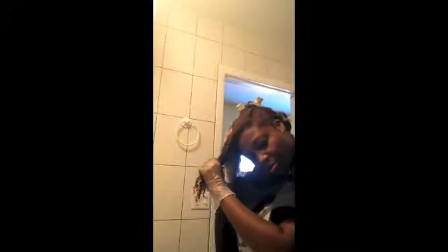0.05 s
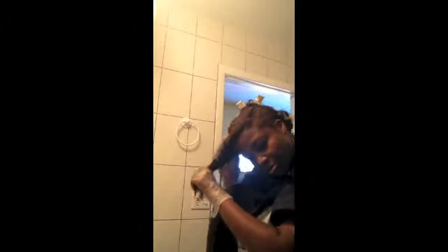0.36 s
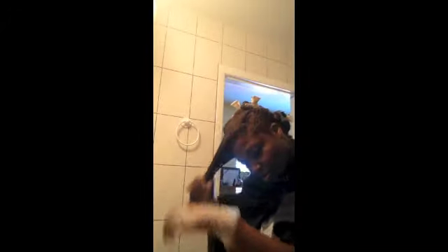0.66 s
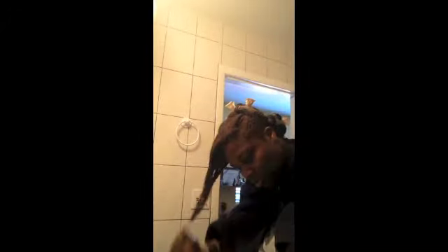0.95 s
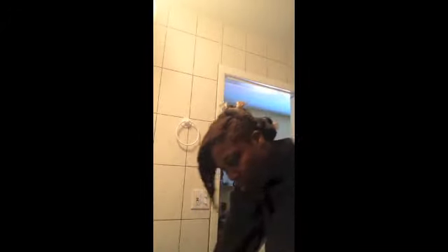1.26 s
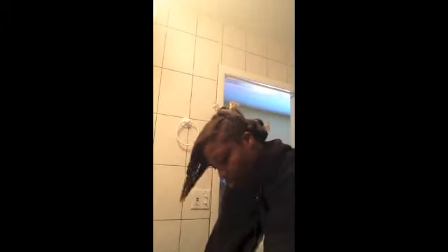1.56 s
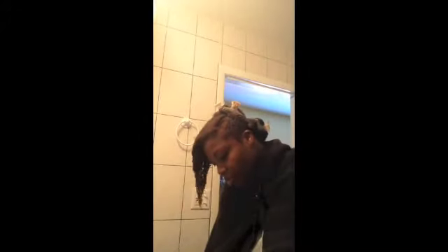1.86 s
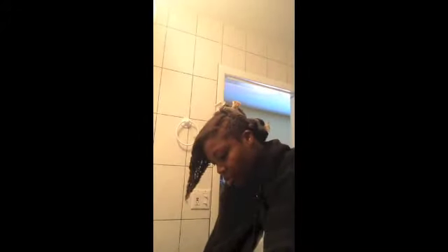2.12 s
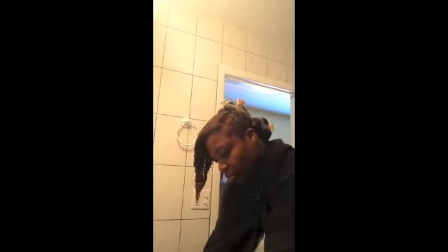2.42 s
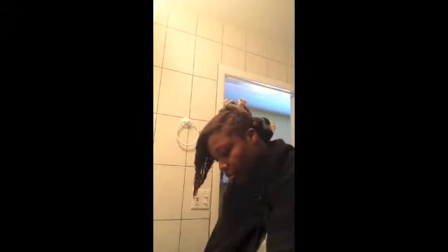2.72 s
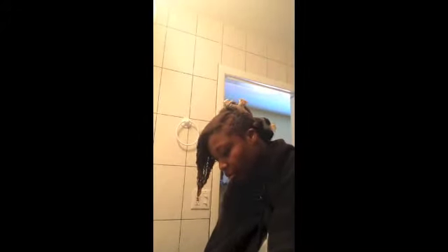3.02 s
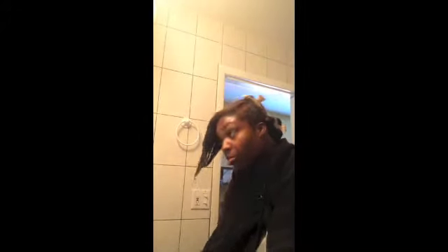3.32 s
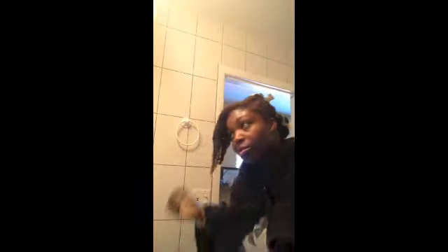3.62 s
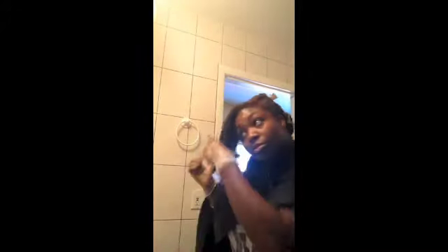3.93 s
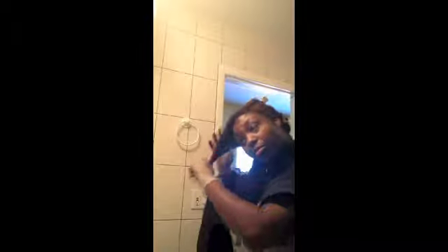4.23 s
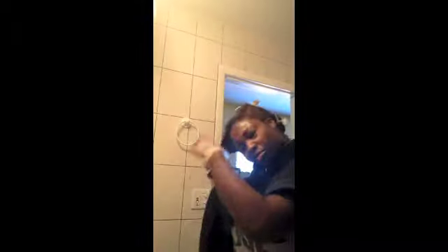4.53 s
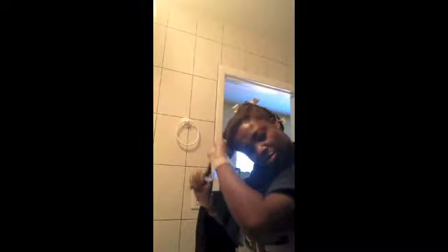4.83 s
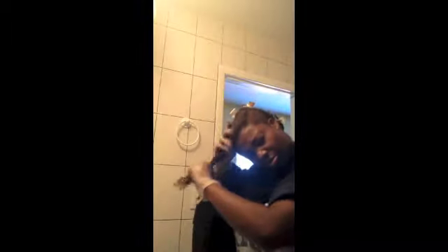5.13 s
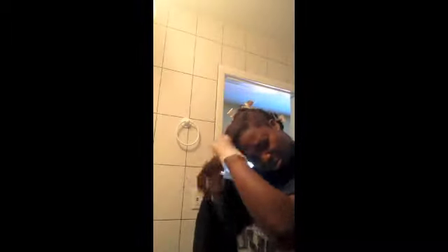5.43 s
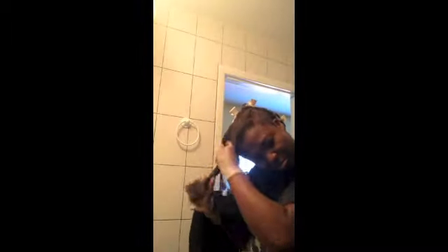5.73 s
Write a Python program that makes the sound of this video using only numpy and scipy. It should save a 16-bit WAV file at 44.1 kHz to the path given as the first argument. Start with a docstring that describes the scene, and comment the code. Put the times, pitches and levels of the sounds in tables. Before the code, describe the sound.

In a quiet tiled bathroom with a faint electrical hum, gloves slide softly down wet hair. A short, low rubbing judder and a few bumps come from the counter, then sleeves swish and fingers tap a hollow plastic container. The container lands with a loud knock, the loudest sound, and clatters briefly. Soft strokes return with crinkles, small squelches and a sharp snap of glove film, all heard through one microphone.

```python
"""Gloved hands work dye through a lock of hair in a small tiled bathroom.
Friction, a dense train of tiny slips, makes wet strands hiss and sleeves rustle; the glove film
crinkles as it buckles and snaps as it comes unstuck. The hands drag on the counter, bump it and tap
a plastic container, exciting their damped normal modes. The container is put down hard, bounces and
rocks to rest. The tiles add a short reverberation, and a faint mains hum lies underneath."""
import sys
import numpy as np
from scipy import signal
from scipy.fft import rfft, irfft
from scipy.io import wavfile

SR = 44100
rng = np.random.default_rng(int(sys.argv[2]) if len(sys.argv) > 2 else 0)


def bounce(signal):
    """Save signal as a 16-bit WAV file at the path given by the first command-line argument."""
    frames = np.transpose(np.atleast_2d(signal))
    limited = np.clip(frames, -1, 1)
    pcm = np.round(limited * 32767).astype(np.int16)
    wavfile.write(sys.argv[1], SR, pcm)


N = 254456
TIME = np.arange(N) / SR

# strokes of a glove down the lock: peak_s, length_s, hiss_db, rub_db, crease_hz
STROKES = [(.01, 0.071, -60.5, -70, 4760), (0.122, 0.17, -64.5, -73.5, 4650), (0.284, 0.14, -58, -69, 3600),
           (0.442, 0.22, -62, -70.5, 4560), (0.585, 0.13, -60.5, -68, 3300),
           (0.8, 0.57, -63.5, -70.5, 5150), (0.93, 0.07, -65, -57, 2980), (1.032, 0.03, -62, -53.5, 2920),
           (1.084, 0.078, -62, -55, 2500), (4.054, 0.086, -75, -95, 8000), (4.287, 0.3, -64, -80, 4130),
           (4.477, 0.26, -71, -76, 5020), (4.7, 0.5, -62, -73.5, 4260), (4.908, 0.19, -64, -71.5, 4900),
           (5.103, 0.25, -59, -69.5, 4000), (5.268, 0.12, -57.5, -64, 4970),
           (5.483, 0.49, -60.5, -68.5, 4130), (5.653, 0.083, -66, -67.5, 2330),
           (5.77, 0.19, -58.5, -65.5, 5200)]
# friction spectra of the strands and of the glove: frequency_hz, density_db
HAIR_SPECTRUM = [(880, -27.5), (1500, -8.5), (1590, -12), (2110, -5.5), (3280, -8), (4100, 0.5), (5450, -2),
                 (6560, 1), (12600, -2), (14600, -2), (15500, -4)]
RUB_SPECTRUM = [(200, -2.5), (800, -5.5), (1350, -10.5), (1900, -2), (2400, 2.5), (3200, -1), (4200, -4.5),
                (7000, -16.5)]
# partials of the mains hum: frequency_hz, rms_db
HUM_PARTIALS = [(58, -77), (120, -72.5)]
# spectrum of the background air: frequency_hz, density_db
AIR_SPECTRUM = [(25, -17.5), (55, 3.5), (90, -6), (150, -3), (260, -9.5), (500, -8), (800, -14.5),
                (1300, -23), (2400, -28.5), (4000, -34), (15000, -34.5)]
# folds of the glove buckling: start_s, length_s, level_db, pitch_hz
CRINKLES = [(.009, .006, -64, 4950), (0.247, .015, -65, 4500), (0.286, 0.0034, -54.5, 3230),
            (0.58, 0.0056, -54, 3100), (0.904, .012, -66, 2570), (1.996, 0.0053, -59, 2880),
            (3.1865, .009, -58.5, 14800), (4.011, .02, -73, 2480), (4.298, .035, -69, 5000),
            (4.349, .014, -67, 3600), (4.463, .006, -69.5, 8000), (4.86, .025, -62, 4340),
            (4.909, 0.01, -61.5, 3980), (5.037, .02, -64, 4410), (5.086, .02, -60, 4600),
            (5.24, .012, -65, 9000), (5.295, .008, -59, 8000), (5.358, .015, -64, 3800),
            (5.427, .008, -57, 7700), (5.457, .006, -47, 9900), (5.507, .018, -60.5, 4350),
            (5.693, .007, -59, 6950), (5.744, .015, -61, 4970)]
# sticky glove film letting go: start_s, snap_db, squelch_db
SNAPS = [(0.286, -66, -56), (0.578, -63, -51), (0.94, -43.5, -72), (1.073, -40, -44.5), (1.349, -42, -66),
         (2.531, -39, -75), (2.694, -53, -55), (2.853, -64, -49.5), (3.187, -57, -70), (3.215, -48, -51.5),
         (4.322, -45, -78), (4.354, -44, -73), (4.692, -57.5, -59), (4.867, -45, -64), (5.128, -57, -58.5),
         (5.457, -46, -62), (5.465, -22, -57), (5.558, -54, -54.5)]
# spectra of the snapping film and of the paste under it: frequency_hz, density_db
SNAP_SPECTRUM = [(500, -52), (1300, -17), (2000, -10), (3200, -15), (4100, 2.5), (5300, -8), (6500, 2.5),
                 (7200, 2), (8000, 1), (10500, -1.5), (13000, 0.5), (15000, -1.5)]
SQUELCH_SPECTRUM = [(500, -21), (1400, -16), (2300, 0), (3000, -1), (4100, -16.5), (6000, -7.5),
                    (15000, -25.5)]
# a sleeve brushing past as an arm moves: peak_s, length_s, swish_db, brush_db
SLEEVE_MOVES = [(1.3, 0.84, -71, -70.5), (1.622, 0.18, -66, -71.5), (1.805, 0.23, -66.5, -68),
                (2, 0.37, -65, -75.5), (2.308, 0.17, -64, -72.5), (2.565, 0.19, -75.5, -83),
                (2.815, 0.2, -67.5, -62.5), (3.029, 0.15, -70, -74.5), (3.225, 0.16, -63, -73),
                (3.524, 0.029, -52.5, -48.5), (3.783, 0.85, -68.5, -71)]
# spectra of the bright swish and the dull brush of cloth: frequency_hz, density_db
SWISH_SPECTRUM = [(760, -45.5), (1300, -14), (1730, -3), (2210, -3), (2800, -0.5), (3690, -3.5), (8040, -5),
                  (15000, -11.5)]
BRUSH_SPECTRUM = [(80, -4), (190, 2), (350, 12.5), (550, 7), (900, 3.5), (1500, -9.5), (4000, -39.5)]
# course of the glove's drag on the counter: time_s, slip_rate_hz, level_db
DRAG_PATH = [(1.02, 190, -66), (1.048, 190, -46), (1.063, 190, -58), (1.073, 165, -42), (1.081, 152, -26.5),
             (1.1, 142, -28.5), (1.108, 193, -32), (1.122, 200, -32), (1.133, 215, -38), (1.141, 175, -32),
             (1.15, 170, -53), (1.175, 185, -49), (1.22, 190, -70)]
# harmonics of the slip rate, from the first upward: level_db
JUDDER_HARMONICS = [-0.5, -31, -32.5, -40]
# spectrum of the rough part of the drag: frequency_hz, density_db
SCUFF_SPECTRUM = [(60, -12), (130, 0), (280, 0), (400, -4), (500, -16), (595, 0), (700, -15), (1200, -22),
                  (4000, -40)]
# soft bumps against the counter: start_s, level_db, contact_s, free_ringing_s
BUMPS = [(1.0665, -48, 0.0045, 0.028), (1.3486, -42.5, 0.00098, .4)]
# modes of the counter panel: frequency_hz, level_db, t60_s
COUNTER_MODES = [(153.3, 6.5, 0.12), (207, 0, 0.28), (320, 5.5, 0.065), (359, 7, 0.07), (478, 3.5, 0.044),
                 (574, 0, 0.058), (790, -5, 0.12), (1040, -7, 0.044)]
# fingers tapping the container: start_s, knock_db, rim_db, wall_hz, wall_db, contact_s
TAPS = [(1.069, -46, -47, 575, -55, 0.0013), (1.136, -51, -43.5, 264, -40.5, .001),
        (1.154, -51, -37, 592, -44.5, 0.0014), (1.166, -48, -38, 570, -61, 0.00082),
        (1.414, -68, -65.5, 407, -66, 0.00067), (2.362, -57, -69, 527, -62, 0.001),
        (2.651, -50.5, -78, 211, -59, 0.0025), (2.696, -47, -63, 270, -47, 0.0012),
        (2.818, -55.5, -60, 594, -55, 0.00085), (2.857, -60, -56, 203, -50.5, 0.00081),
        (3.216, -56, -51, 310, -53, 0.0013), (3.236, -47, -51, 156, -49, 0.0012),
        (3.277, -54.5, -53.5, 454, -50, 0.001), (3.287, -47.5, -58.5, 337.6, -59, 0.0009)]
# modes of the hollow container in the hand: frequency_hz, level_db, t60_s
HOLLOW_MODES = [(130, -5, 0.093), (195, -1, 0.053), (346, 6, 0.042), (440, 5, 0.03), (549, -0.5, 0.075),
                (780, 0.5, 0.017)]
# spectrum of the rim's clack: frequency_hz, density_db
RIM_SPECTRUM = [(100, -60), (500, -2.5), (1000, -3.5), (1600, -3), (2700, 0), (3600, -11), (6000, -20),
                (14000, -34)]
# the container landing and bouncing: start_s, ring_db, crack_db, mode_scatter_db, cutoff_hz, thump_db
LANDINGS = [(3.5201, -38.5, -14.5, 1, 14800, -57), (3.5699, -56.5, -22, -1.5, 9620, -54),
            (3.5955, -62, -27.5, 5.5, 7600, -70)]
# modes of the container on the counter, and of the cabinet below: frequency_hz, level_db, t60_s
CONTAINER_MODES = [(143.8, 10, 0.4), (215.5, 7, 0.2), (244.3, 6, 0.15), (325, -1, 0.066), (369, 8.5, 0.24),
                   (401.7, 5, 0.26), (459, 6.5, 0.2), (503, 9, 0.21), (520, 7.5, 0.13), (630, -3, 0.22),
                   (720, -2, 0.24), (799, -1.5, 0.22), (850, -0.5, 0.32), (941, 0.5, 0.25),
                   (1005, 17, 0.092), (1083, 9, .08), (1198, 8.5, 0.05), (1389, -5.5, 0.25),
                   (1471, 7.5, 0.12), (1617, 6, .085), (1974, 7.5, 0.05), (2183, 6, 0.09),
                   (2300, -4, 0.055), (2900, 4.5, 0.05), (3440, -5, .08), (3660, 7.5, 0.062),
                   (4330, 3, 0.059), (4225, 4, 0.035), (4540, 0, 0.065), (4750, 5, 0.05), (5400, 0, 0.05),
                   (6970, 0, .05), (7280, -4.5, 0.036), (8730, 6, 0.027)]
CABINET_MODES = [(33, 1, 0.18), (48, -7, .17)]
# spectrum of the hard contact: frequency_hz, density_db
CRACK_SPECTRUM = [(40, -28), (100, -34.5), (250, 0), (500, 9), (1000, -4.5), (1750, -9), (2200, 0),
                  (2650, -11), (3350, -4.5), (4000, -8.5), (4450, -4.5), (5300, -10.5), (6900, -9.5),
                  (8000, -11), (11000, -17.5), (15000, -21)]
# contacts of the rocking base: start_s, level_db
ROCKS = [(3.675, -48.5), (3.761, -56), (3.822, -48.5), (3.884, -47.5), (3.918, -55), (3.967, -56.5)]
# spectrum of the base's clatter: frequency_hz, density_db
BASE_SPECTRUM = [(100, -20), (330, 10.5), (480, 2), (750, -15), (1180, 2.5), (1700, -15), (2350, 6),
                 (2900, -13), (3400, -8.5), (5000, -18.5), (12000, -28)]
# reverberation time of the bathroom: frequency_hz, t60_s
ROOM_T60 = [(100, 0.32), (300, 0.22), (1000, 0.26), (3000, 0.21), (8000, 0.24), (15000, 0.18)]


def from_db(db):
    """Amplitude ratio of a level in decibels."""
    return 10 ** (np.asarray(db) / 20)


def unit_rms(x):
    """Normalisation to unit mean power."""
    return x / np.sqrt(np.mean(x ** 2) + 1e-20)


def at_hz(points, hz):
    """Interpolation on a logarithmic frequency axis."""
    freqs, values = np.transpose(points)
    return np.interp(np.log(hz + 1e-6), np.log(freqs), values)


def butterworth(x, kind, hz, order=2):
    """Filter with a maximally flat passband."""
    return signal.sosfilt(signal.butter(order, hz, kind, fs=SR, output="sos"), x)


def colour(x, spectrum, size=4096):
    """Minimum-phase filtering by the folded cepstrum; white noise keeps its power."""
    gain = unit_rms(from_db(at_hz(spectrum, np.fft.rfftfreq(size, 1 / SR))))
    cepstrum = irfft(np.log(gain))
    cepstrum[1:size // 2] *= 2
    cepstrum[size // 2 + 1:] = 0
    return signal.fftconvolve(x, irfft(np.exp(rfft(cepstrum))))[:len(x)]


def add(track, start_s, sound):
    """Superposition of a delayed sound on a track."""
    start = round(start_s * SR)
    track[start:start + len(sound)] += sound[:N - start]


def reflections(x):
    """Diffuse reverberation: a unit-energy tail of echoes from the tiles decays band by band."""
    t, tail = TIME[:SR * 2 // 3], 0
    edges = np.geomspace(60, 18000, 13)
    for low, high in zip(edges, edges[1:]):
        band = butterworth(rng.standard_normal(len(t)), "band", [low, high])
        tail = tail + band * from_db(-60 * t / at_hz(ROOM_T60, np.sqrt(low * high)))
    tail *= np.clip(t / 0.0028, 0, 1) ** 2
    return signal.fftconvolve(x, tail / np.linalg.norm(tail))[:N]


def bathroom(x, wet_db):
    """Direct sound plus the reverberant field."""
    return x + from_db(wet_db) * reflections(x)


def clicks(times, levels_db):
    """An ideal impulse for each contact."""
    out = np.zeros(N)
    out[np.round(times * SR).astype(int)] = from_db(levels_db)
    return out


def bursts(times, levels_db, t60_s, rise_s, wet_db):
    """Dense, heavily damped modes merge into a decaying noise at each contact; the room answers."""
    out, t = np.zeros(N), TIME[:SR // 4]
    envelope = np.minimum(t / rise_s, 1) * from_db(-60 * t / t60_s)
    for start_s, db in zip(times, levels_db):
        add(out, start_s, from_db(db) * envelope * rng.standard_normal(len(t)))
    return out + from_db(wet_db) * np.linalg.norm(envelope) * reflections(clicks(times, levels_db))


def soft_push(t, contact_s):
    """Force pulse of unit sum: the longer the contact, the narrower its spectrum."""
    force = np.sin(np.pi * np.minimum(t / contact_s, 1)) ** 2
    return force / force.sum()


def ring(force, modes):
    """Modal superposition: damped oscillators share one force, neighbours swinging in opposite senses."""
    out = 0
    for k, (hz, db, t60_s) in enumerate(modes):
        radius, angle = from_db(-60 / (t60_s * SR)), 2 * np.pi * hz / SR
        feedback = [1, -2 * radius * np.cos(angle), radius ** 2]
        out = out + (-1) ** k * from_db(db) * signal.lfilter([0, np.sin(angle)], feedback, force + 1e-18)
    return out


def wander(per_s):
    """Slow random modulation: Gaussian values joined by straight lines."""
    knots = TIME[::SR // per_s]
    return np.interp(TIME, knots, rng.standard_normal(len(knots)))


def slips(per_s, spread_db, clump_db):
    """Friction as shot noise: tiny slips of uneven size, in clumps of some 15 ms; rms 1."""
    clumps = from_db(clump_db * wander(per_s=70))
    sizes = from_db(spread_db * np.minimum(rng.exponential(1, N), 5))
    return unit_rms(clumps * sizes * rng.choice([-1, 1], N) * (rng.random(N) < per_s / SR))


def swells(times, lengths, levels_db, rise_share=0.52, flatness=2.8):
    """Each movement swells to its greatest speed and fades; incoherent overlaps add in power."""
    coarse_time, power = TIME[::64], 0
    for peak_s, length_s, db in zip(times, lengths, levels_db):
        offset = (coarse_time - peak_s) / length_s
        distance = np.maximum(-offset / rise_share, offset / (1 - rise_share))
        power = power + (from_db(db) * np.exp(-distance ** flatness)) ** 2
    return np.interp(TIME, coarse_time, np.sqrt(power))


def flicker(x, depth_db, per_s):
    """Independent amplitude modulation of each treble band makes the timbre wander."""
    edges, out = np.geomspace(2000, 16000, 7), x
    for low, high in zip(edges, edges[1:]):
        drift = np.interp(TIME * per_s, np.arange(400), rng.standard_normal(400))
        out = out + (from_db(depth_db * drift) - 1) * butterworth(x, "band", [low, high], order=1)
    return out


def crease_ring(hz, bandwidth_hz=330, wander_octaves=0.11):
    """Small catches drive the resonance of a glove crease, whose pitch moves as the fingers close."""
    pitch_hz = hz * 2 ** (wander_octaves * wander(per_s=25))
    phasor = np.exp(2j * np.pi * np.cumsum(pitch_hz) / SR)
    catches = slips(per_s=670, spread_db=3.0, clump_db=6.5)
    # a one-pole decay in a frame that rotates at the pitch is a gliding resonator
    ringing = phasor * signal.lfilter([1], [1, -np.exp(-np.pi * bandwidth_hz / SR)], catches / phasor)
    return unit_rms(bathroom(butterworth(ringing.imag, "high", 1910), wet_db=-1.5))


def hair_strokes():
    """Sliding friction: strands hiss, glove creases rub lower down, and the wet dye crackles finely."""
    peak_s, length_s, hiss_db, rub_db, crease_hz = np.transpose(STROKES)
    strands = slips(per_s=5000, spread_db=0.5, clump_db=0.5)
    glove = slips(per_s=900, spread_db=4.0, clump_db=-0.5)
    hiss = flicker(colour(bathroom(strands, wet_db=-15.0), HAIR_SPECTRUM), depth_db=0.5, per_s=26)
    rub = flicker(colour(bathroom(glove, wet_db=-1.5), RUB_SPECTRUM), depth_db=4.5, per_s=30)
    crease = from_db(-12.5) * crease_ring(np.interp(TIME, peak_s, crease_hz))
    dye = slips(per_s=130, spread_db=2.0, clump_db=5.0)
    crackle = from_db(-15) * unit_rms(colour(bathroom(dye, wet_db=-3.0), HAIR_SPECTRUM))
    rustle = unit_rms(hiss) + crease + crackle
    return swells(peak_s, length_s, hiss_db) * rustle + swells(peak_s, length_s, rub_db) * unit_rms(rub)


def room_tone():
    """Stationary background: the line spectrum of mains hum over a broadband rush of air."""
    hum = sum(np.sqrt(2) * from_db(db) * np.sin(2 * np.pi * (hz * TIME + rng.random()))
              for hz, db in HUM_PARTIALS)
    return hum + from_db(-73.5) * colour(rng.standard_normal(N), AIR_SPECTRUM)


def glove_crinkles(tick_count=7, spread_db=14, band_ratio=1.2):
    """Buckling: a fold gives way in a run of uneven ticks, at a pitch set by its size."""
    out = np.zeros(N)
    for start_s, length_s, db, hz in CRINKLES:
        ticks = np.zeros(SR // 10)
        place, weakness = rng.random((2, tick_count))
        signs = rng.choice([-1, 1], tick_count)
        ticks[(place * length_s * SR).astype(int)] = from_db(-spread_db * weakness) * signs
        fold = butterworth(ticks, "band", [hz / band_ratio, hz * band_ratio], order=1)
        add(out, start_s, from_db(db) * np.sqrt(length_s * SR) * fold / np.linalg.norm(fold))
    return bathroom(butterworth(out, "high", 2000), wet_db=-8.5)


def glove_snaps():
    """Adhesion fails: the film tears free with a click and flutters, and the paste under it squelches."""
    start_s, snap_db, squelch_db = np.transpose(SNAPS)
    click = clicks(start_s, snap_db + 3)
    flutter = bursts(start_s, snap_db - 11.5, t60_s=0.024, rise_s=0.001, wet_db=-4.0)
    squelch = bursts(start_s, squelch_db, t60_s=0.061, rise_s=0.0024, wet_db=-10.5)
    return colour(click + flutter, SNAP_SPECTRUM) + colour(squelch, SQUELCH_SPECTRUM)


def sleeves():
    """Friction noise of soft cloth: a dull, fine-grained brush, with the fibres swishing above it."""
    peak_s, length_s, swish_db, brush_db = np.transpose(SLEEVE_MOVES)
    fibres = slips(per_s=7000, spread_db=1.5, clump_db=2.0)
    swish = unit_rms(colour(bathroom(fibres, wet_db=-10.5), SWISH_SPECTRUM))
    brush = unit_rms(colour(slips(per_s=720, spread_db=-0.5, clump_db=-1.5), BRUSH_SPECTRUM))
    return swells(peak_s, length_s, swish_db) * swish + swells(peak_s, length_s, brush_db) * brush


def glove_drag():
    """Stick-slip on the counter: a low judder that rises as the pressure eases, with a rough scuff."""
    time_s, slip_rate_hz, level_db = np.transpose(DRAG_PATH)
    phase = 2 * np.pi * np.cumsum(np.interp(TIME, time_s, slip_rate_hz) * (TIME > time_s[0])) / SR
    judder = sum(from_db(db) * np.sin(k * phase) for k, db in enumerate(JUDDER_HARMONICS, 1))
    scuff = from_db(-17) * unit_rms(colour(slips(per_s=900, spread_db=1.5, clump_db=1.0), SCUFF_SPECTRUM))
    envelope = np.interp(TIME, time_s, from_db(level_db), left=0, right=0)
    return bathroom(envelope * (judder + scuff), wet_db=-20.0)


def counter_bumps(damping_s=0.0046):
    """A soft impact excites only the low modes, which vibrate freely until the hand damps the panel."""
    out, t = np.zeros(N), TIME[:SR // 2]
    for start_s, db, contact_s, free_s in BUMPS:
        damping = np.exp(-np.maximum(t - free_s, 0) / damping_s)
        add(out, start_s, from_db(db) * damping * ring(soft_push(t, contact_s), COUNTER_MODES))
    return bathroom(butterworth(out, "high", 107), wet_db=-9.0)


def container_taps(wall_t60_s=0.11):
    """Finger impacts excite the hollow body's modes and a note of the gripped wall; the rim clacks."""
    body, t = np.zeros(N), TIME[:SR // 4]
    for start_s, knock_db, _, wall_hz, wall_db, contact_s in TAPS:
        modes = [(hz, knock_db + db + rng.standard_normal(), t60_s) for hz, db, t60_s in HOLLOW_MODES]
        add(body, start_s, ring(soft_push(t, contact_s), modes + [(wall_hz, wall_db, wall_t60_s)]))
    start_s, _, rim_db = np.transpose(TAPS)[:3]
    rim = colour(bursts(start_s, rim_db, t60_s=0.041, rise_s=0.0039, wet_db=-3.0), RIM_SPECTRUM)
    return bathroom(butterworth(body, "high", 79), wet_db=-5.0) + rim


def container_landing(delay_at_1khz_s=0.0013):
    """A hard impact cracks and excites container, counter and cabinet modes; each bounce is duller."""
    start_s, ring_db, crack_db, scatter_db, cutoff_hz, thump_db = np.transpose(LANDINGS)
    crack, body = 0, 0
    for k in range(len(start_s)):
        click = clicks(start_s[[k]], crack_db[[k]] + 11.5)
        rattle = bursts(start_s[[k]], crack_db[[k]], t60_s=0.028, rise_s=0.00091, wet_db=-4.0)
        crack = crack + butterworth(click + rattle, "low", cutoff_hz[k])
    for hz, db, t60_s in CONTAINER_MODES:
        arrival_s = start_s + delay_at_1khz_s * np.sqrt(1000 / hz)   # low bending waves travel slower
        blows = clicks(arrival_s, ring_db + scatter_db * rng.standard_normal(len(start_s)))
        body = body + ring(blows, [(hz, db, t60_s)])
    body = butterworth(butterworth(body, "high", 136), "high", 136)
    thump = ring(clicks(start_s, thump_db), CABINET_MODES)
    return bathroom(body, wet_db=-12.5) + colour(crack, CRACK_SPECTRUM) + thump


def container_rocking():
    """Repeated inelastic impacts: the base rolls down onto the counter with a dull clatter."""
    start_s, level_db = np.transpose(ROCKS)
    return colour(bursts(start_s, level_db, t60_s=0.097, rise_s=0.0036, wet_db=-10.5), BASE_SPECTRUM)


def scene():
    """Linear superposition of all sources at one microphone."""
    hands = hair_strokes() + sleeves() + glove_snaps() + glove_crinkles()
    counter = counter_bumps() + glove_drag()
    container = container_taps() + container_landing() + container_rocking()
    return (hands + counter + container + room_tone())[None]


def record(dry, cutoff_hz=15350):
    """Band limiting: the microphone sheds the deepest bass, and a steep low-pass cuts the top."""
    low_pass = signal.ellip(12, .1, 70, cutoff_hz, fs=SR, output="sos")
    return signal.sosfilt(low_pass, butterworth(dry, "high", 35))


dry = scene()
out = record(dry)
bounce(out)
```